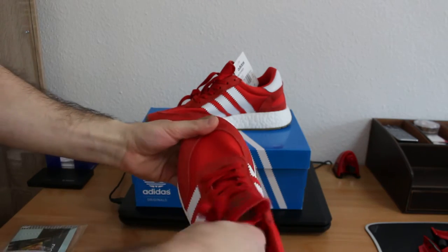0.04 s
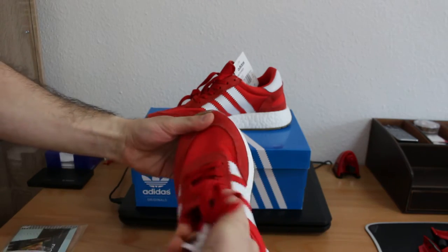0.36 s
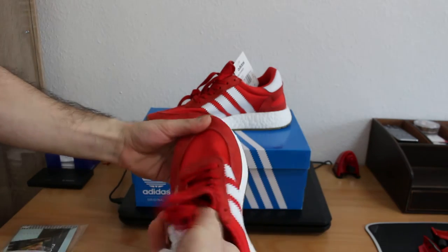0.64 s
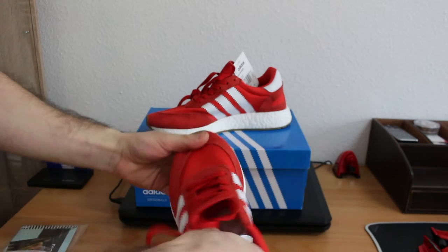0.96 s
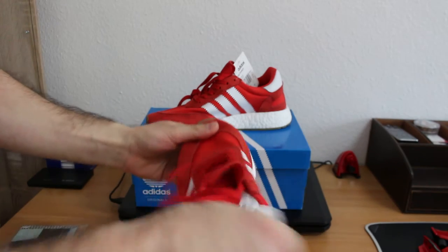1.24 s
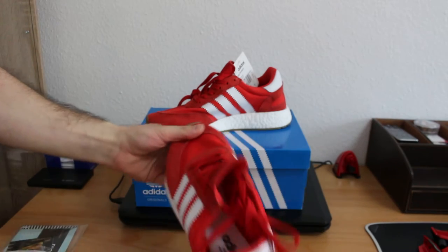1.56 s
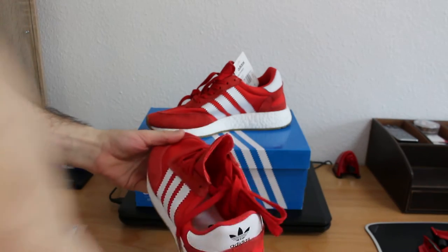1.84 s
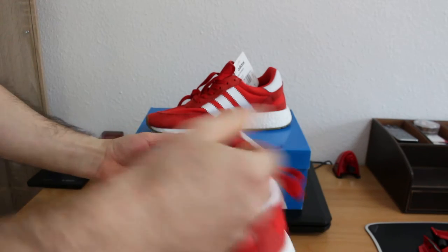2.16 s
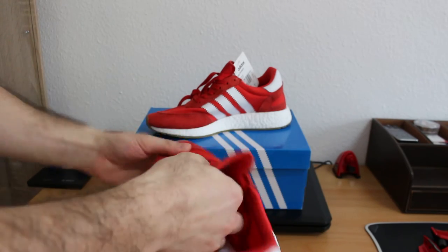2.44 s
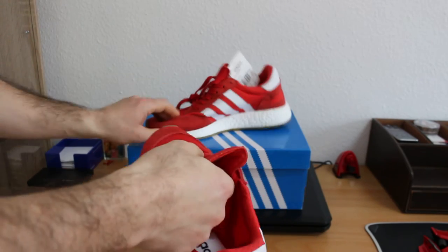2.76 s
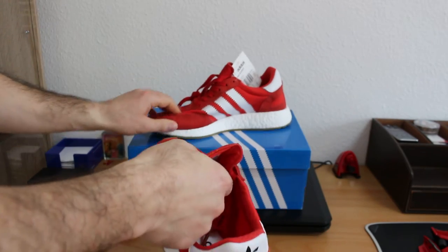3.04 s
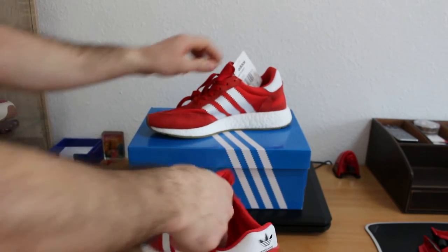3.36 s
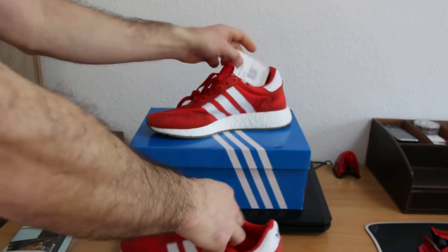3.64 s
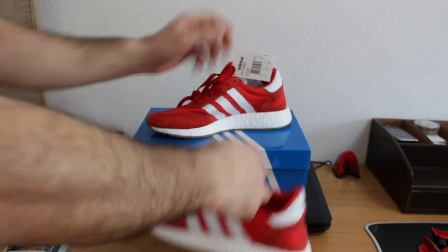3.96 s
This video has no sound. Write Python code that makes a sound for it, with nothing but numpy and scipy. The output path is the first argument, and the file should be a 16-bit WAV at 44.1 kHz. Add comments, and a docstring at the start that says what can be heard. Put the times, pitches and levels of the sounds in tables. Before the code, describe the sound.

A fabric shoe being handled, with rubbing, paper crinkles, light thumps and a snapping tag.

```python
"""A hand rubs in and out of a fabric trainer over a desk, its paper stuffing crinkling for the first second.
Two light snaps follow, and the hollow of the shoe rises in pitch as the hand slides out to grip the collar.
From about two seconds the hand knocks on a cardboard box and the shoes thump on the desk, until a heel lands
with a boom. Last, a card tag snaps and crinkles between the fingers. The desk and the bare walls of the small
room echo the handling, over a faint, steady hiss."""
import sys
import numpy as np
from scipy import signal
from scipy.fft import rfft, irfft, next_fast_len
from scipy.io import wavfile
from scipy.ndimage import map_coordinates

SR = 44100
rng = np.random.default_rng(int(sys.argv[2]) if len(sys.argv) > 2 else 0)


def wrap_up_sound(samples):
    """Save the sound to the file named by the first command line argument, as 16-bit audio."""
    columns = np.atleast_2d(samples).T
    # keep every value between -1 and 1, then stretch to whole-number steps
    tamed = np.clip(columns, -1, 1)
    steps = np.round(tamed * 32767).astype(np.int16)
    wavfile.write(sys.argv[1], SR, steps)


N = 176400
HIT_S, LEVEL_S = 0.5, 0.02  # length of a hit or a room tail; time that a hit's level refers to
PAN_DB = 0.5  # the hands work a little to the left


def rubbing():
    """Strokes of skin on fabric: each swells and fades, its level trembling with the friction."""
    # Each row: peak time, rise and fall in seconds, then level, treble lift and bass lift in dB.
    strokes = [(0.01, 0.19, 0.17, -35, -1, 0.5), (0.10, 0.059, 0.028, -32, -5, -9),
               (0.208, 0.086, 0.1, -32.5, 0.5, 2.5), (0.385, 0.067, 0.095, -33, -2, 3),
               (0.60, 0.1, 0.073, -34, 1.5, -8), (0.602, 0.007, 0.018, -30.5, -19, 9.5),
               (0.68, 0.19, 0.053, -39.5, -3, 5), (0.784, 0.12, 0.051, -32.5, -1.5, 0.5),
               (0.985, 0.098, 0.036, -32.5, 1, 7), (1.15, 0.16, 0.13, -47, -11, 2),
               (1.285, 0.076, 0.073, -34, 2.5, 7.5), (1.305, 0.02, 0.024, -27, 0.5, 4),
               (1.45, 0.036, 0.022, -42, 0, 10), (1.57, 0.13, 0.039, -44.5, 1.5, 5.5),
               (1.69, 0.04, 0.1, -54, -6, -1), (1.83, 0.046, 0.063, -42.5, 5, -1),
               (2.069, 0.12, 0.22, -69, 14.5, -7), (2.218, 0.0092, 0.042, -34.5, 3.5, 10),
               (2.37, 0.024, 0.027, -33, 6.5, 10), (2.509, 0.019, 0.038, -47, -4, 5),
               (3.05, 0.11, 0.081, -55.5, -6, 19.5), (3.55, 0.037, 0.15, -62, 8, 18),
               (3.726, 0.029, 0.025, -42, 4.5, -9), (3.79, 0.022, 0.03, -37.5, 2, 9),
               (3.931, 0.088, 0.015, -42.5, 3.5, -1)]
    shape, rough_db = 1.14, 1.9  # a shape of 1 is pointed, 2 is rounded
    out, n = np.zeros((2, N + SR)), SR // 2
    t = (np.arange(n) - n // 2) / SR
    for peak_s, rise, fall, db, treble_db, bass_db in strokes:
        swell = np.exp(-np.abs(t / np.where(t < 0, rise, fall)) ** shape)
        bass, middle, treble = weave(n)
        friction = amp(bass_db) * bass + middle + amp(treble_db) * treble
        rub = swell * amp(db + rough_db * wobble(71.7, n)) * friction
        add(out, peak_s, room(rub, wet_db=-1.5))
    return hollow(out[:, n // 2:][:, :N])  # shifted so that each stroke peaks on its time


def weave(n):
    """Sliding skin hisses while single threads catch and slip; returns bass, middle and treble."""
    # Each row: frequency in Hz, relative spectrum level of the fabric in dB.
    fabric = [(53, -53), (90, -51), (133, -18), (282, -13.5), (639, -6.5), (1220, -1.5), (1650, -2.5),
              (3100, -3.5), (7780, -14.5), (15500, -30.5)]
    snags_per_s, spread_db, snag_db = 1500, 2, -5
    bass_hz, treble_hz = 650, 4170
    snags = (rng.random(n) < snags_per_s / SR) * rng.choice([-1, 1], n)
    sizes = amp(spread_db * np.minimum(rng.exponential(size=n), 4))
    friction = rng.standard_normal(n) + amp(snag_db) * unit(snags * sizes)
    hiss = unit(filtered(friction, lambda hz: amp(along(fabric, hz))))
    bass = filtered(hiss, lambda hz: lowpass(hz, bass_hz))
    treble = filtered(hiss, lambda hz: 1 - lowpass(hz, treble_hz))
    return bass, hiss - bass - treble, treble


def hollow(rub):
    """The shoe's cavity colours the rub: rising as the hand slides out, low once it grips the collar."""
    # Each row: time in seconds, resonance in Hz.
    glide = [(0.8, 2190), (1.7, 1820), (1.81, 2380), (1.835, 3450), (2.04, 5200), (2.21, 1220)]
    boost_db, q = 5.5, 5.8
    hz, t, spectrum = signal.stft(rub, SR, nperseg=512)
    ratio = (hz[:, None] + 1) / np.interp(t, *np.transpose(glide))
    peak = 1 / (1 + (q * (ratio - 1 / ratio)) ** 2)
    return signal.istft(spectrum * amp(boost_db * peak), SR)[1][:, :N]


def knocks():
    """Hard knocks of the hand make the cardboard box rattle and ring."""
    # Each row: start in seconds, level in dB, low-pass corner in Hz, rattle t60 in seconds.
    hits = [(2.423, -37, 1910, 0.032), (2.780, -25, 5740, 0.032), (2.787, -28.5, 4170, 0.042),
            (2.799, -27.5, 1320, 0.069), (2.807, -28.5, 1990, 0.055), (3.143, -33, 2830, 0.036),
            (3.163, -33.5, 1760, 0.06), (3.585, -31, 6000, 0.099), (3.616, -35, 2020, 0.07),
            (3.906, -32, 3340, 0.047), (3.980, -41, 1000, 0.05)]
    # Each row: frequency in Hz, relative level of the crack in dB.
    colour = [(60, -17), (180, -9.5), (400, 2), (750, -0.5), (1400, -2), (1850, -2.5), (2400, -4.5),
              (4200, -12), (7000, -21), (15000, -26)]
    # Each row: a mode of the box in Hz, relative level in dB, t60 in seconds.
    box = [(404, 3.5, 0.084), (488, -2, 0.23), (604, -3, 0.22), (682, -6.5, 0.32), (857, -7, 0.13),
           (1100, 2.5, 0.12), (1800, -17, 0.088)]
    return strikes(hits, colour, box, ring_db=-7, rattle_db=8.5, wet_db=-1)


def thumps():
    """Soft contacts of sole and hand: a scuff and a short hollow tone around one low resonance."""
    # Each row: start in seconds, level in dB, resonance in Hz, t60 in seconds.
    hits = [(0.607, -42.5, 257, 0.016), (1.488, -46.5, 224, 0.08), (1.610, -51.5, 403, 0.01),
            (2.207, -47, 164, 0.14), (2.244, -45.5, 85, 0.78), (2.229, -37, 434, 0.13),
            (2.243, -38.5, 202, 0.28), (2.248, -41, 446, 0.06), (2.345, -53, 145, 0.55),
            (2.372, -45, 252, 0.067), (2.401, -49, 431, 0.044), (3.072, -43.5, 264, 0.18),
            (3.231, -33.5, 260, 0.22), (3.253, -39.5, 383, 0.097), (3.291, -34, 279, 0.11),
            (3.296, -44, 650, .05), (3.318, -38.5, 403, 0.088), (3.588, -29, 373.5, 0.14),
            (3.631, -36, 404, 0.14), (3.697, -32.5, 374, 0.15), (3.774, -40.5, 272, 0.55),
            (3.905, -31.5, 389, 0.24), (3.912, -32.5, 292, 0.3), (3.930, -33.5, 404, 0.25)]
    skirt_db, top_hz, ring_db = -19, 910, -1.5
    out = np.zeros((2, N))
    for start, db, centre_hz, t60 in hits:
        def body(hz):
            return (resonance(hz, centre_hz, q=3.5) + amp(skirt_db)) / np.hypot(1, (hz / top_hz) ** 3)
        scuff = contact(t60, rattle_db=3, gain=body)
        tone = amp(ring_db) * ring([(centre_hz, 0, t60)], attack_s=0.0012)
        add(out, start, room(amp(db) * blow(scuff + tone), wet_db=-4.5))
    return out


def landings():
    """The cushioned heel sets the desk top booming, close and dry."""
    # Each row: start in seconds, level in dB.
    hits = [(3.587, -25), (3.632, -33)]
    # Each row: a mode of the desk in Hz, relative level in dB, t60 in seconds.
    desk = [(83, -16, .4), (130, -5, .14), (152, -2, .16), (178, 1, .09), (208, 3, .33), (248, -8, .2),
            (390, -6, .15)]
    out = np.zeros(N)
    for start, db in hits:
        add(out, start, amp(db) * ring(desk, attack_s=0.0044))
    return out * amp([[PAN_DB], [-PAN_DB]])


def snaps():
    """The card tag and lace tips snap: a sharp click with a brief ring."""
    # Each row: start in seconds, level in dB, low-pass corner in Hz, rattle t60 in seconds.
    hits = [(1.486, -42, 4500, 0.0022), (1.771, -48.5, 6000, 0.0018), (3.695, -25, 15100, 0.0083),
            (3.711, -33, 3800, 0.039), (3.807, -34.5, 2040, 0.0016)]
    # Each row: frequency in Hz, relative level of the click in dB.
    colour = [(100, -16), (400, 1.5), (850, -4), (1250, 4.5), (1700, 4), (2150, -12), (2800, 4.5),
              (4300, -5.5), (6500, -13), (12000, -15.5), (16000, -38)]
    # Each row: a mode of the tag in Hz, relative level in dB, t60 in seconds.
    tag = [(1140, 0, .12), (1255, -1, .11), (1370, -5, .07), (1480, -8, .13), (1744, -12, .14)]
    return strikes(hits, colour, tag, ring_db=-2, rattle_db=3, wet_db=0.5)


def crinkles(per_spell=22):
    """Small creases tick in the paper stuffing, later in the tag, each with its own pitch and size."""
    # Each row: start and end of a spell in seconds, typical level in dB, typical pitch in Hz.
    spells = [(0.06, 1.02, -42, 2680), (3.72, 4.8, -54.5, 6900)]
    out = np.zeros((2, N))
    for start, end, db, mid_hz in spells:
        for s in np.linspace(start, end, per_spell):
            late, size, pitch = rng.uniform(-1, 1, 3)
            centre_hz = mid_hz * np.exp(0.5 * pitch)
            colour = lambda hz: resonance(hz, centre_hz, q=3.5) * lowpass(hz, corner_hz=10700)
            crease = amp(db + 4.2 * size) * contact(t60=0.0093, rattle_db=2.5, gain=colour)
            add(out, abs(s + 0.03 * late), room(crease, wet_db=-0.5))
    return out


def strikes(hits, colour, modes, ring_db, rattle_db, wet_db):
    """Hard contacts: a crack and the object's ring, both duller the softer the touch."""
    out = np.zeros((2, N))
    for start, db, corner_hz, t60 in hits:
        crack = contact(t60, rattle_db, lambda hz: amp(along(colour, hz)))
        softness = lambda hz: 1 / (1 + 1j * np.sqrt(2) * hz / corner_hz - (hz / corner_hz) ** 2)
        hit = blow(filtered(crack + amp(ring_db) * ring(modes), softness))
        add(out, start, room(amp(db) * hit, wet_db))
    return out


def contact(t60, rattle_db, gain):
    """A push and a dying rattle, coloured by the thing that is struck."""
    t = np.arange(int(HIT_S * SR)) / SR
    push = blow(1. * (t == 0))
    rattle = blow(rng.standard_normal(len(t)) * amp(-60 * t / t60))
    return blow(filtered(push + amp(rattle_db) * rattle, lambda hz: causal(gain(hz))))


def ring(modes, attack_s=0.00014):
    """Damped modes, their balance a little different at each blow."""
    t = np.arange(int(HIT_S * SR)) / SR
    tones = sum(amp(db + rng.normal(0, 1) - 60 * t / t60) * np.sin(2 * np.pi * hz * t)
                for hz, db, t60 in modes)
    return blow(tones * (1 - np.exp(-t / attack_s)))


def room(x, wet_db, build_s=0.0014):
    """Direct sound, early echoes off desk and walls and a diffuse tail, drawn anew for each sound."""
    # Each row: frequency in Hz, t60 of the tail in seconds.
    decay = [(100, 0.79), (400, 0.3), (1500, 0.36), (5000, 0.38), (14000, 0.16)]
    # Each row: frequency in Hz, level of the reflections in dB, added to wet_db.
    colour = [(100, -7.5), (400, -2.5), (1500, -5), (5000, -0.5), (14000, 2.5)]
    # Each row: frequency in Hz, left-right likeness of the reflections (1 is mono).
    alike = [(100, 0.84), (400, 0.93), (1200, .7), (2500, 0.5), (5000, 0.42), (12000, -0.19)]
    # Each row: delay of an early echo in seconds, its level against the tail in dB.
    walls = [(.007, -8), (.016, -12.5), (0.023, -11)]
    n = int(HIT_S * SR)
    hz, t, noise = signal.stft(rng.standard_normal((2, n)), SR, nperseg=256)
    t60 = along(decay, hz)[:, None]
    envelope = amp(-60 * t / t60) * (1 - np.exp(-t / build_s))
    tail = signal.istft(noise * envelope, SR)[1][:, :n]
    tail /= np.linalg.norm(tail[0])
    for delay, db in walls:
        for side in tail:
            add(side, abs(delay + rng.normal(0, 0.0004)), amp([db]))
    answer = filtered(stereo(tail, alike), lambda f: amp(wet_db + along(colour, f)))
    answer[:, 0] += 1  # the direct sound
    answer /= np.sqrt(np.sum(answer ** 2) / 2)
    return signal.fftconvolve(x[None], answer, axes=1) * amp([[PAN_DB], [-PAN_DB]])


def room_hiss(level_db=-54.5):
    """The steady air of the room and the microphone's hiss, faint and wide."""
    # Each row: frequency in Hz, relative spectrum level in dB.
    colour = [(15, -46), (25, -1.5), (227, 1), (741, -3.5), (1530, -6), (3530, -9), (9050, -16.5),
              (15500, -25.5)]
    # Each row: frequency in Hz, left-right likeness (1 is mono).
    alike = [(40, 0.24), (250, 0.093), (1500, 0.057), (6000, 0.025)]
    air = filtered(rng.standard_normal((2, N)), lambda hz: amp(along(colour, hz)))
    return amp(level_db) * unit(stereo(air, alike))


def amp(db):
    """Decibels to gain."""
    return 10 ** (np.asarray(db) / 20)


def unit(x):
    """Scale to rms 1."""
    return x / np.sqrt(np.mean(x ** 2) + 1e-20)


def blow(x):
    """Scale a hit to the energy of LEVEL_S seconds at rms 1."""
    return x * np.sqrt(LEVEL_S * SR / np.sum(x ** 2))


def along(points, hz):
    """Read a curve of (Hz, value) points on a log frequency axis."""
    freqs, values = np.transpose(points)
    return np.interp(np.log(hz + 1), np.log(freqs + 1), values)


def resonance(hz, centre_hz, q):
    """Gain of one resonant band, 1 at its centre."""
    return 1 / np.hypot(1, q * (hz / centre_hz - centre_hz / (hz + 1)))


def lowpass(hz, corner_hz):
    """Gain that falls 24 dB an octave above the corner."""
    return 1 / (1 + (hz / corner_hz) ** 4)


def filtered(x, response):
    """Shape x by a response given as a function of Hz."""
    n = x.shape[-1]
    padded = next_fast_len(n + 8192)
    return irfft(rfft(x, padded) * response(np.fft.rfftfreq(padded, 1 / SR)), padded)[..., :n]


def causal(gain):
    """The minimum-phase response with this gain: nothing rings ahead of the hit."""
    cepstrum = irfft(np.log(np.maximum(gain, 1e-6)))
    half = len(cepstrum) // 2
    return np.exp(rfft(np.r_[cepstrum[0], 2 * cepstrum[1:half], np.zeros(half)]))


def wobble(rate, n):
    """A smooth random curve of n samples, rate knots a second."""
    return map_coordinates(rng.standard_normal(400), [np.arange(n) * rate / SR], mode="wrap")


def stereo(pair, alike):
    """Mix two unrelated signals into left and right of the given likeness."""
    turn = lambda hz: np.arccos(np.clip(along(alike, hz), -1, 1)) / 2
    mid, side = filtered(pair, lambda hz: np.array([np.cos(turn(hz)), np.sin(turn(hz))]))
    return np.array([mid + side, mid - side])


def add(track, start_s, x):
    """Mix x into the track, dropping what runs past its end."""
    part = track[..., round(start_s * SR):][..., :x.shape[-1]]
    part += x[..., :part.shape[-1]]


def scene():
    """All the handling, thinned in the deep bass by the microphone, over the quiet room."""
    handling = knocks() + snaps() + rubbing() + crinkles() + thumps() + landings()
    low_hz = 85
    low_cut = lambda hz: (1j * hz / low_hz) ** 2 / (1 + 1j * hz / low_hz - (hz / low_hz) ** 2)
    return filtered(handling, low_cut) + room_hiss()


def record(dry):
    """The bass leans left, the treble right, and the very top is cut away."""
    # Each row: frequency in Hz, dB added on the left and taken off the right.
    tilt = [(100, 1), (400, 0.9), (2000, 0), (8000, -0.6)]
    top_hz = 15850
    return filtered(dry, lambda hz: (hz < top_hz) * amp(np.outer([1, -1], along(tilt, hz))))


dry = scene()
out = record(dry)
wrap_up_sound(out)
```